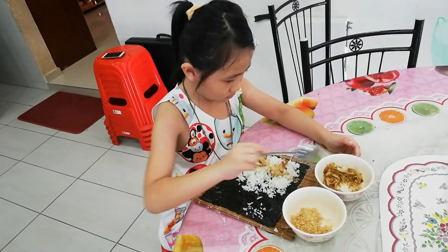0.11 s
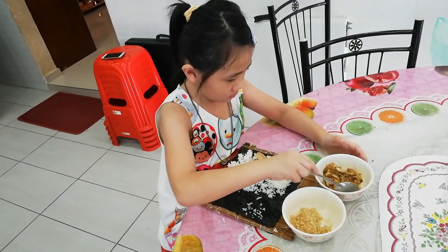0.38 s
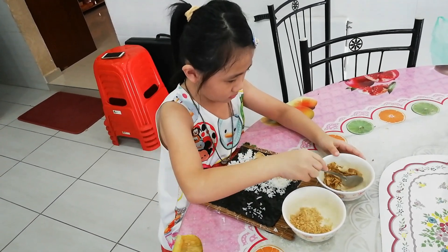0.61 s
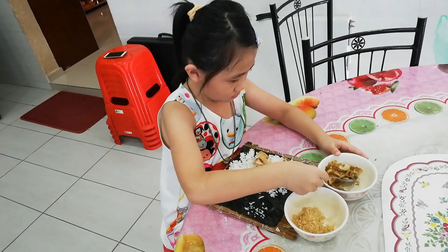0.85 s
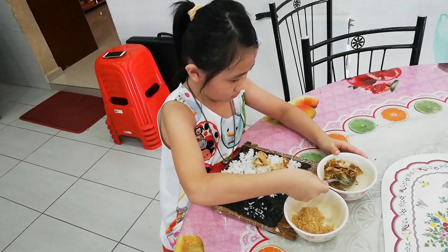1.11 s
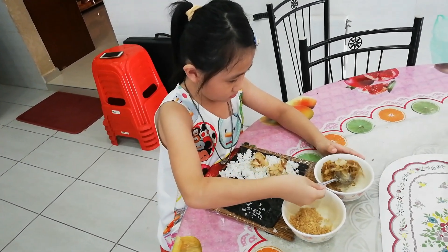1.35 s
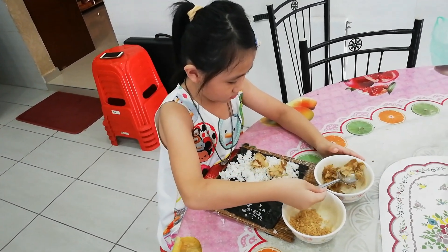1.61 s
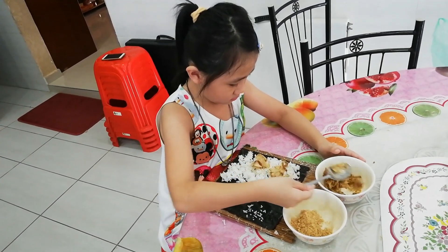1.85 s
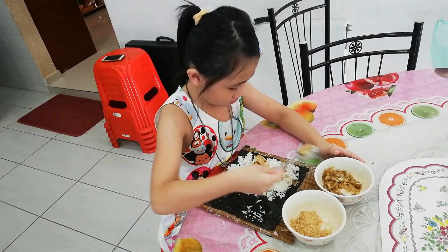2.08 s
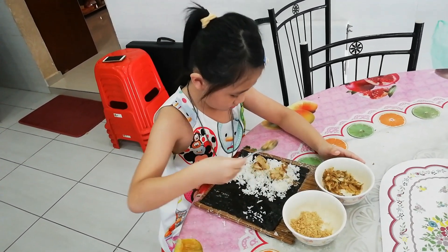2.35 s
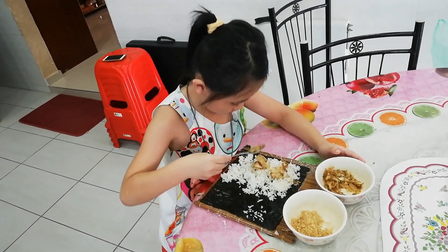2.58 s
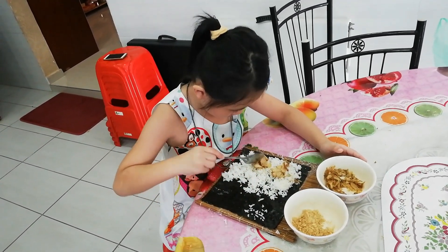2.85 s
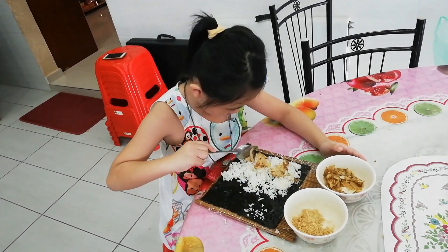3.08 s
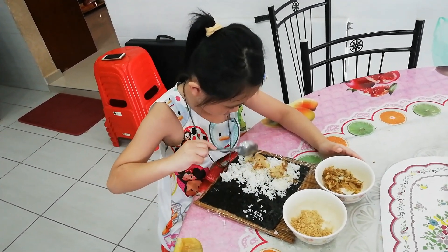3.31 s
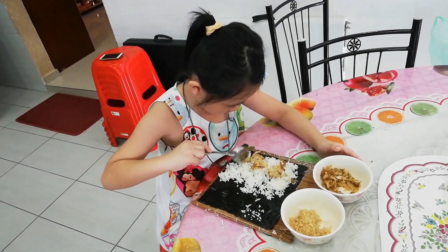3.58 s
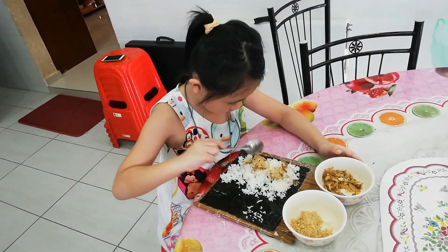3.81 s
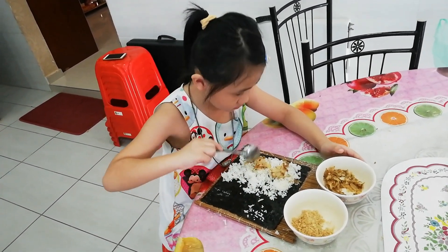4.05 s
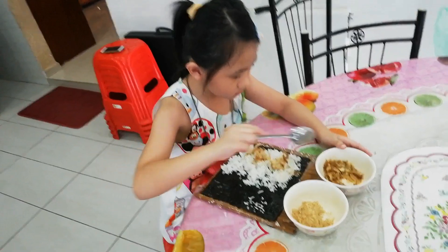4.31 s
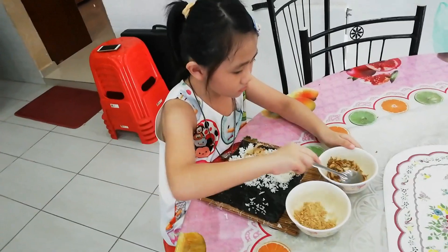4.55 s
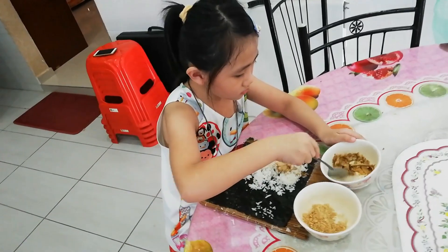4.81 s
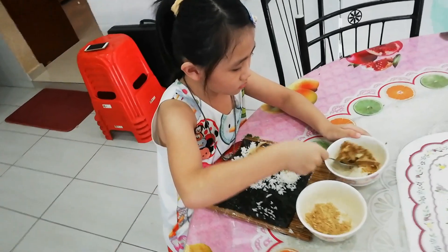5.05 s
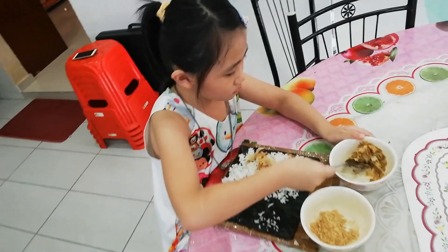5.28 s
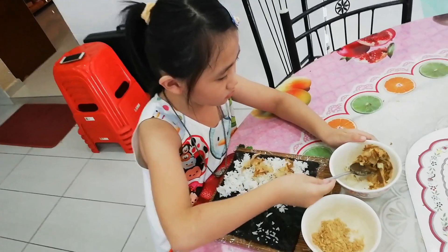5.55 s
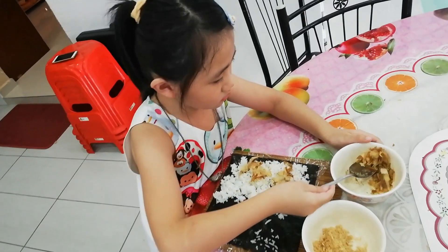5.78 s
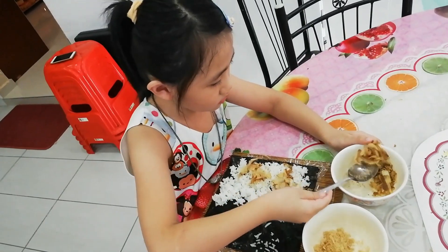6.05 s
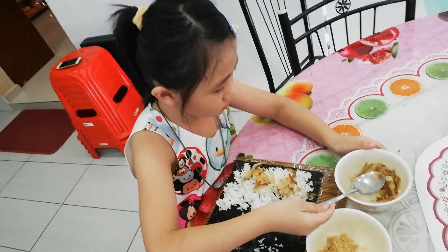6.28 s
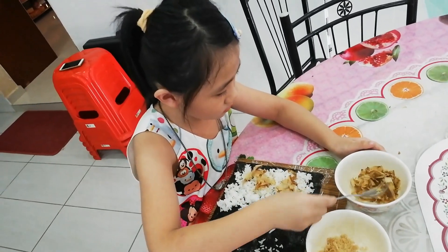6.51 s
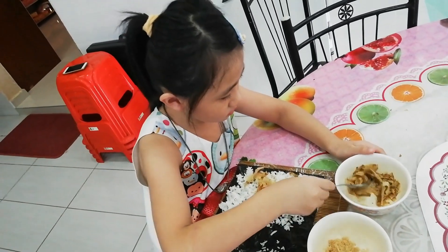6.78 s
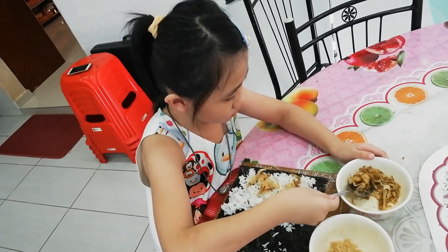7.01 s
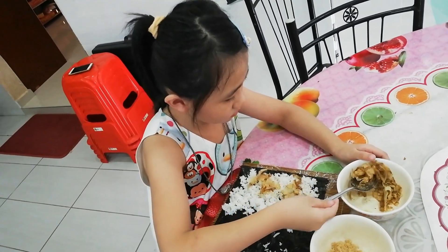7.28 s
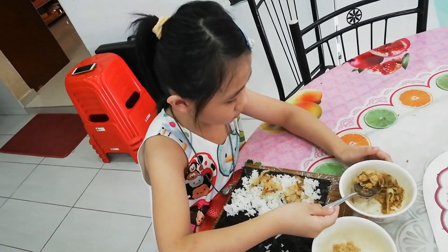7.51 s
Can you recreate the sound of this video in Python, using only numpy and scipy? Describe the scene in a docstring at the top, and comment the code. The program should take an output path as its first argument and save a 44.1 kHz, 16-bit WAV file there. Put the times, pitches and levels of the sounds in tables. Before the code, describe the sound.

A hard tiled indoor room holds steady fan hiss and low wavering motor hum, heard by two spaced microphones. At about 0.4 s a steel spoon clicks dully in a food-filled bowl close on the right, scraping softly until 0.7, with a fainter drag near 0.8. From 1.2 to 1.55 a distant drawer slides, gathering speed, and faint rubbed tones follow until 2.0. At 2.04 to 2.2 a far door clacks and bangs with a deep boom; a softer thud comes at 2.57, and a latch clack at 2.8 with a last knock at 3.0. Quieter room noise follows. A small hollow double tap sounds at 4.14. The spoon strikes hardest at 4.57, clinks again at 4.63 and 4.76 and scrapes brightly, with a short drag at 5.1. A final click and brief scrapes come at 6.67 to 6.8. Sparse dry ticks and faint treble rustles continue to about 7.5.

```python
"""Fans hiss and motors hum throughout in a hard tiled room; small dry ticks come now and then.
First a steel spoon clicks and scrapes in a damped, food-filled bowl to the right of two spaced microphones.
Then, farther off, a drawer slides, and a door latches and bangs with a deep boom.
Later a hollow object taps and the spoon scoops twice more. Contacts are short noise pushes that ring
damped modes; scrapes are grainy noise through such modes; the air is shaped noise and the hum is sines."""
import sys
import numpy as np
from scipy import signal
from scipy.fft import rfft, irfft, next_fast_len
from scipy.io import wavfile
from scipy.ndimage import uniform_filter1d, map_coordinates

SR = 44100
rng = np.random.default_rng(int(sys.argv[2]) if len(sys.argv) > 2 else 0)


def store_wav(level_fs):
    """Save 16-bit WAV to argv[1]."""
    pcm = np.round(np.clip(np.atleast_2d(level_fs), -1, 1) * 32767)
    wavfile.write(sys.argv[1], SR, pcm.T.astype(np.int16))


def to_linear_factor(level_db):
    """Convert decibel levels (scalar or array-like) to linear amplitude factors."""
    exponent = np.asarray(level_db, float) / 20
    return 10 ** exponent


N = 336700  # length of the scene in samples


def along(points, hz):
    """Reads a curve of (Hz, value) points on a log frequency axis."""
    f, v = np.transpose(points)
    return np.interp(np.log(hz + 1), np.log(f + 1), v)


def unit(x):
    """Scales a sound to rms 1."""
    return x / np.sqrt(np.mean(x ** 2) + 1e-20)


def wobble(rate):
    """A smooth random curve with rate knots a second."""
    knots = rng.standard_normal(int(N * rate / SR) + 4)
    return map_coordinates(knots, [np.arange(N) * rate / SR])


def filtered(x, response):
    """Multiplies the spectrum of x by a complex response of frequency."""
    m = 2 * next_fast_len(x.shape[-1] // 2 + 2048)
    spectrum = rfft(x, m) * response(np.fft.rfftfreq(m, 1 / SR))
    return irfft(spectrum, m)[..., :x.shape[-1]]


def body(modes, tilt_db=0, dips=(), steep=1.31):
    """Causal response of damped modes whose energies add, tilted by tilt_db per octave about 3 kHz."""
    def response(f):
        def peak(c, w):
            return (f * w) ** 2 / ((c * c - f * f) ** 2 + (f * w) ** 2)
        power = sum(to_linear_factor(db + tilt_db * np.log2(c / 3000)) ** 2 * peak(c, w) ** steep for c, w, db in modes)
        power = power * to_linear_factor(2 * sum(db * peak(c, w) for c, w, db in dips))
        # fold the cepstrum forward in time: the minimum-phase response starts at once
        cep = irfft(np.log(power + 1e-12) / 2)
        half = len(cep) // 2
        return np.exp(rfft(np.r_[cep[0], 2 * cep[1:half], np.zeros(len(cep) - half)]))
    return response


# How alike diffuse sound is at the two microphones.
# Each row: frequency in Hz, likeness from -1 (opposite) to 1 (the same).
LIKENESS = [(60, 1), (110, 1), (200, 0.94), (380, 0.5), (700, -0.7), (1290, 0.36), (2380, -0.07),
            (4400, -0.13), (8120, 0.24), (15000, -0.39)]


def turn_between(hz):
    """Angle in radians between left and right whose cosine is their likeness."""
    return np.arccos(np.clip(along(LIKENESS, hz), -1, 1))


def pair(length):
    """Spectrogram of diffuse noise at two spaced microphones: much alike in the bass only."""
    hz, t, (a, b) = signal.stft(rng.standard_normal((2, length)), SR, nperseg=256)
    turn = turn_between(hz)[:, None] / 2
    left = np.cos(turn) * a + np.sin(turn) * b
    right = np.cos(turn) * a - np.sin(turn) * b
    return hz, t, np.array([left, right])


LAG = 27  # samples by which the left microphone hears the right side late
# Left microphone's loss for sound from the right. Each row: frequency in Hz, gain in dB.
LEFT_SHADE = [(500, -6.5), (1000, -3), (2300, -21), (4500, -2.5), (8000, -2), (12000, -23.5)]
# How long the room rings. Each row: frequency in Hz, time to fall by 60 dB in seconds.
ROOM_DECAY = [(100, 0.86), (300, 0.63), (700, 0.89), (1840, 0.67), (4850, 0.74), (12800, 0.53),
              (15800, 0.15)]


def heard(x, pan_db, room_db, onset=0.00073, lean=0.25, dull_db=-2.5):
    """Direct sound from the right, late and shaded on the left, plus a fresh room tail that leans the same way.
    pan_db is left over right before the shading; onset is in seconds."""
    late = np.pad(x, (LAG, 0))[:len(x)]
    left = filtered(late, lambda hz: to_linear_factor(along(LEFT_SHADE, hz)))
    direct = np.array([left * to_linear_factor(pan_db / 2), x * to_linear_factor(-pan_db / 2)])
    hz, t, z = pair(SR)
    side = to_linear_factor(lean * (pan_db + along(LEFT_SHADE, hz)) / 2)[:, None]
    z = z * to_linear_factor(-60 * t / along(ROOM_DECAY, hz)[:, None]) * [side, 1 / side]
    tail = signal.istft(z, SR, nperseg=256)[1][:, :SR]
    # reflections thicken after the first walls
    tail = tail * (1 - np.exp(-(np.arange(SR) / SR / onset) ** 2))
    tail = tail * np.sqrt(2) / np.linalg.norm(tail)
    wet = signal.fftconvolve(x[None], tail, axes=1)[:, :len(x)]
    # the walls swallow the highest treble
    wet = filtered(wet, lambda hz: to_linear_factor(dull_db * np.log2(1 + (hz / 8000) ** 2)))
    return direct + to_linear_factor(room_db) * wet


def add(out, s, x):
    """Mixes x in at s seconds."""
    out[:, round(s * SR):][:, :x.shape[1]] += x


def blows(out, rows, modes, dips=()):
    """Each contact is a rough push of a few ms or so, about even in all frequencies, that rings the modes."""
    t = np.arange(SR) / SR
    for s, db, pan_db, tilt_db, room_db, ms in rows:
        u = t * 1000 / max(ms, .05)
        push = rfft(rng.standard_normal(SR) * u * np.exp(-2 * u))
        evenness = np.sqrt(np.abs(uniform_filter1d(np.abs(push) ** 2, size=250)) + 1e-9)
        push = irfft(push / evenness, SR) * (t < .4)
        ring = filtered(push, body(modes, tilt_db, dips))
        # the level counts the energy of the whole ring per ms
        ring = to_linear_factor(db) * ring * np.sqrt(SR / 1000) / np.linalg.norm(ring)
        add(out, s, heard(ring, pan_db, room_db))


def rubbing(out, rows, modes, dips=(), *, pan_db, room_db, grainy_db):
    """Friction noise in tiny grains; duller and brighter versions of the body cross-fade with the stroke."""
    s, db, tilt_db = np.transpose(rows)
    t = s[0] + np.arange(round((s[-1] - s[0] + 1) * SR)) / SR
    grains = unit(uniform_filter1d(rng.standard_normal(len(t)), size=60))
    grit = rng.standard_normal(len(t)) * to_linear_factor(grainy_db * grains)
    # -6 dB per octave or less is all dull, 6 or more all bright
    share = np.clip(.5 + np.interp(t, s, tilt_db) / 12, 0, 1)
    dull, bright = (unit(filtered(grit, body(modes, lean, dips))) for lean in (-6, 6))
    level = to_linear_factor(np.interp(t, s, db, right=-150))
    add(out, s[0], heard(level * unit((1 - share) * dull + share * bright), pan_db, room_db))


# Colour of the fans. Each row: frequency in Hz, relative level in dB per Hz.
FAN_COLOUR = [(12, -41), (20, -6), (70, -10), (100, -2.5), (132, -9), (170, -1.5), (231, -9.5), (304, -6.5),
              (475, -20), (828, -19.5), (1010, -22.5), (1700, -27), (6120, -31.5), (10700, -30),
              (15300, -39)]
# Level of the middle of the room noise, which jumps up around the door bangs.
# Each row: time in seconds, rise in dB.
MIDDLE_SWELL = [(0, 7), (1.1, 10), (1.9, 7.5), (2.0, 15.5), (2.7, 12.5), (3.3, 4.5), (4.25, 9), (4.5, 3.5),
                (5.3, 5.5), (7.6, 4.5)]
# Faint rustles in the treble. Each row: middle in seconds, rise over the hiss in dB, half length in seconds.
TREBLE_RUSTLES = [(3.97, 2.5, .04), (4.43, 4.5, 0.085), (5.4, 3.5, 0.46), (6.31, 3.5, 0.2),
                  (7.1, 5.5, 0.18)]
FAN_DB = -58.5  # rms before the swell and the rustles


def fans():
    """Shaped noise hisses and rumbles; its middle jumps up around the door bangs, its treble rustles at times."""
    hz, t, z = pair(N)
    middle = np.interp(t, *np.transpose(MIDDLE_SWELL))
    top = sum(db * np.exp(-((t - s) / half) ** 2) for s, db, half in TREBLE_RUSTLES)
    middle_share = along([(350, 0.1), (700, 0.49), (3500, 1), (5000, 0.35)], hz)
    top_share = along([(3500, 0), (5000, 1)], hz)
    swell_db = np.outer(middle_share, middle) + np.outer(top_share, top)

    def shape(z):
        noise = signal.istft(z, SR, nperseg=256)[1][:, :N]
        return filtered(noise, lambda f: to_linear_factor(along(FAN_COLOUR, f)))
    return to_linear_factor(FAN_DB) * shape(z * to_linear_factor(swell_db)) / np.std(shape(z))


# Steady tones of motors, the refrigerator among them. Each row: frequency in Hz, typical peak level in dB.
MOTOR_TONES = [(48.4, -66), (102.3, -63.5), (166.9, -72), (269.2, -68), (839.8, -73), (1475, -88),
               (1723, -78), (3628, -79.5), (8759, -77), (10013, -80), (10492, -82)]
WAVER_DB = 1.8  # how far the hum wavers


def motors():
    """Sines that waver in level and phase, turned between the microphones."""
    time = np.arange(N) / SR
    hum = 0
    for hz, db in MOTOR_TONES:
        level = to_linear_factor(db + WAVER_DB * wobble(4.7))
        turn = np.array([[0], [1]]) * turn_between(hz)
        hum = hum + level * np.sin(2 * np.pi * hz * time + 0.55 * wobble(6.8) + turn)
    return hum


# Small dry ticks. Each row: time in seconds, level in dB (energy per ms), left over right in dB before
# the shading, room in dB.
TICK_TIMES = [(0.1506, -51, -6, -4), (1.1834, -51.5, 2, 3), (2.7428, -41.5, 4, 8), (4.3616, -45.5, -18, 0),
              (4.368, -45, -2, -10), (4.3854, -49.5, -1.5, 7.5), (5.3304, -40.5, -2, 3.3),
              (5.6131, -44.5, -9, -1), (5.8358, -52, -2, -1), (7.4592, -53.5, -8, 7)]
TICK_TILT_DB, TICK_MS = 1.7, 0.35  # brightness in dB per octave, contact time


def ticks(out):
    """Very short pushes ring three broad modes."""
    rows = [(s, db, pan_db, TICK_TILT_DB, room_db, TICK_MS) for s, db, pan_db, room_db in TICK_TIMES]
    blows(out, rows, [(1150, 1800, 7.0), (4000, 10000, 0), (10600, 1700, 4.0)])  # (Hz, width Hz, dB)


# Bowl and spoon modes; their balance differs by chance from contact to contact. Each row: frequency in Hz,
# width in Hz, mean level in dB, swing in dB, offset in radians. Levels are before the brightness tilt.
BOWL_MODES = [(391.5, 9.4, -18.5, 0, 2.5), (620, 270, -35.5, 18.5, -2.1), (1130, 320, -7, 10, 0.01),
              (1377, 85, -12.5, 9, 2.5), (2045, 410, -10.5, 5.5, -2), (2590, 480, -6.5, -5, -4),
              (3390, 460, -0.5, 7, 0.93), (4295, 530, -1.5, 5.5, 0.62), (5020, 310, -2, 7, 0.9),
              (5840, 840, -10.5, 9.5, -2.5), (7190, 560, -0.5, 5.5, -1.15), (7777, 430, -4.5, 6.5, -1.03),
              (8180, 180, 0.2, 8, 3.5), (8820, 820, -5, 4, -3), (10470, 370, -1.5, 1.5, 0.99),
              (11330, 470, 1, 8.5, -1.96), (12870, 810, -8.5, 4.5, -2.2), (14500, 450, -17.9, 15, -1.3)]
# How many times each mode's level swings as the angle makes a full turn: one count per mode.
SWING_COUNTS = [2, 3, 2, 3, 4, 3, 3, 3, 3, 2, 2, 4, 4, 2, 4, 4, 3, 2]
# Narrow bands that are thin in the spoon sounds. Each row: frequency in Hz, width in Hz, gain in dB.
THIN_BANDS = [(3700, 160, -11.5), (6000, 190, -10)]


def bowl_modes(angle):
    """Each contact rings the modes in a chance balance, set by one angle and a count per mode."""
    modes = []
    for (hz, width, db, swing, offset), count in zip(BOWL_MODES, SWING_COUNTS):
        modes.append((hz, width, db + swing * np.cos(count * angle - offset)))
    return modes, THIN_BANDS


# Spoon contacts. Each row: time in seconds, blow in dB (energy per ms), brightness in dB per octave,
# room in dB, angle that sets the balance of the modes in radians.
SPOON_BLOWS = [(0.394, -25.5, -4.5, 5.5, 5.24), (0.41, -19, -2, 1, 5.47),
               (4.5678, -11.5, -0.86, -1.5, 1.11), (4.6282, -22, -0.5, 7.5, 1.08),
               (4.7569, -17, 18, -6, 4.74), (6.6676, -17.5, -0.4, 0.5, 1.44)]
SPOON_PAN_DB, SPOON_MS = -3.5, 2.14  # left over right before the shading, contact time


def spoon_clicks(out):
    """The spoon strikes the bowl in three scoops and rings its modes."""
    for s, db, tilt_db, room_db, angle in SPOON_BLOWS:
        blows(out, [(s, db, SPOON_PAN_DB, tilt_db, room_db, SPOON_MS)], *bowl_modes(angle))


# The spoon drags along the glaze. Each row: start in seconds, length in seconds, level in dB, swell over
# the stroke in dB, brightness in dB per octave, angle that sets the balance of the modes in radians.
SPOON_DRAGS = [(0.439, 0.23, -53.5, 5.5, -3, 5.3), (0.761, 0.073, -64, 5, -6, 5.7),
               (4.769, .15, -36.5, 1.5, 2, 4.79), (5.105, 0.11, -47, -14, 4, 0.073),
               (6.684, 0.056, -45, -2.5, -22, 1.62), (6.775, 0.025, -33.5, -6, 1.5, 2)]
BITE_S, LET_GO_S, EDGE_DB = .02, 0.048, -29  # a stroke rises from and falls to this far under its level


def spoon_scrapes(out):
    """Friction in grains drives the bowl while the spoon bites, drags and lets go."""
    for s, length, db, swell_db, tilt_db, angle in SPOON_DRAGS:
        end, end_db = s + length, db + swell_db
        stroke = [(s - BITE_S, db + EDGE_DB), (s, db), (end, end_db), (end + LET_GO_S, end_db + EDGE_DB)]
        rows = [(t, level, tilt_db) for t, level in stroke]
        rubbing(out, rows, *bowl_modes(angle), pan_db=0.0, room_db=-3.5, grainy_db=0.5)


# Narrow tones that sing briefly while something rubs. Each row: start in seconds, end in seconds,
# level in dB 25 ms after the start, frequency in Hz, width in Hz.
RUBBED_TONES = [(0.796, .934, -70, 2180, 31), (0.791, .934, -68.5, 2600, 29),
                (1.756, 1.86, -70.5, 1302, 54), (1.857, 2.01, -65, 1130, 70), (5.1, 5.28, -64, 4490, 120),
                (6.682, 6.797, -55, 2570, 110)]


def whistles(out):
    """Friction noise through one narrow mode, loudest at the start."""
    for start, end, db, hz, width in RUBBED_TONES:
        rows = [(start, db + 5, 0), (start + 0.025, db, 0), (end, db - 9.0, 0)]
        rubbing(out, rows, [(hz, width, 0)], pan_db=-18.0, room_db=3.0, grainy_db=0.5)


# The far drawer gathers speed and stops. Each row: time in seconds, level in dB.
DRAWER_SLIDE = [(1.172, -53), (1.19, -58.5), (1.42, -43.5), (1.5, -49.5), (1.56, -70)]
# Modes of the drawer. Each row: frequency in Hz, width in Hz, level in dB before the tilt.
DRAWER_MODES = [(730, 150, -2), (1080, 140, -2), (1250, 100, 0), (2020, 320, -8), (2374, 190, -4),
                (3020, 160, -17), (3380, 160, -42)]
SLIDE_TILT_DB = 7  # past 6, so wholly the brighter version


def drawer(out):
    """Coarse friction rings the drawer's modes as it slides."""
    rows = [(s, db, SLIDE_TILT_DB) for s, db in DRAWER_SLIDE]
    rubbing(out, rows, DRAWER_MODES, pan_db=-2, room_db=0.5, grainy_db=3.0)


# Low modes of the house. Each row: frequency in Hz, width in Hz, relative level in dB,
# time to fall by 60 dB in seconds.
LEAF_MODES = [(40, 11, -14.5, 2.2), (70, 59, -1.5, 1.27), (114, 19, -3, 0.76), (153.4, 22, 4.5, 0.31),
              (267, 58, -9, 0.97), (403, 15, -18, 0.7)]
BOOM_DB, BOOM_GROWS = 10, 2.975  # the leaf's boom grows faster than the clack


def leaf_boom(blow_db):
    """The heavy leaf shakes the low modes of the house, which swell and then die away."""
    t = np.arange(SR) / SR
    shake = rng.standard_normal(SR)
    boom = 0
    for hz, width, db, t60 in LEAF_MODES:
        tone = unit(filtered(shake, body([(hz, width, 0)])))
        boom = boom + tone * to_linear_factor(db - 60 * t / t60)
    boom = to_linear_factor(BOOM_GROWS * blow_db + BOOM_DB) * boom * (1 - np.exp(-(t / 0.024) ** 2))
    return np.array([np.roll(boom, LAG // 2), boom])


# Far door. Each row: time in seconds, blow in dB (energy per ms), brightness in dB per octave,
# room in dB, contact time in ms.
DOOR_BLOWS = [(2.042, -22.5, 2, 3.5, 14), (2.16, -23, 0.5, 6, 12), (2.1755, -13, .8, -0.5, 3.7),
              (2.191, -16, -0.1, 8.5, 4.3), (2.565, -31.5, -0.2, 2, 47), (2.8045, -19.5, 1.2, 3, 3.6),
              (2.824, -33, 3.7, 14, 9.7), (2.996, -25, -2, 4.5, 3)]
# Modes of the latch. Each row: frequency in Hz, width in Hz, level in dB before the tilt.
LATCH_MODES = [(460, 110, -13), (950, 640, -5), (1320, 320, -7.5), (2030, 640, -3), (2770, 630, -0.5),
               (4630, 510, -19.5), (8000, 4800, -13.5), (11300, 2300, -20)]


def door(out):
    """The latch clacks and the leaf booms with each blow."""
    blows(out, [(s, db, 0, *rest) for s, db, *rest in DOOR_BLOWS], LATCH_MODES)
    for s, db, *_ in DOOR_BLOWS:
        add(out, s, leaf_boom(db))


# A small hollow object taps. Each row: time in seconds, level in dB (energy per ms), left over right
# in dB before the shading.
TAP_TIMES = [(4.137, -35.5, -9.5), (4.143, -33, -1)]
# Modes of the hollow object. Each row: frequency in Hz, width in Hz, relative level in dB.
HOLLOW_MODES = [(1560, 105, 16), (2600, 92, 15.5), (3380, 340, -10), (4100, 300, -22), (5200, 400, -17)]
TAP_ROOM_DB, TAP_MS = -5.5, 1.6


def taps(out):
    """Short pushes ring the modes of a hollow object."""
    blows(out, [(s, db, pan_db, 0, TAP_ROOM_DB, TAP_MS) for s, db, pan_db in TAP_TIMES], HOLLOW_MODES)


def scene():
    """Table, far drawer and door, and room noise."""
    out = np.zeros((2, N + 3 * SR))  # room for tails past the end
    ticks(out)
    spoon_clicks(out)
    spoon_scrapes(out)
    whistles(out)
    drawer(out)
    door(out)
    taps(out)
    return out[:, :N] + fans() + motors()


def top_cut(x):
    """Nothing passes above the cut-off."""
    return signal.sosfilt(signal.butter(12, 16480, fs=SR, output="sos"), x)


TOP_HZ = 15400  # the highest treble is cut above this


def record(dry):
    """The sound falls 14 dB per 500 Hz above its top edge, 42 dB at most."""
    mix = filtered(dry, lambda hz: to_linear_factor(-14 * np.clip((hz - TOP_HZ) / 500, 0, 3)))
    return top_cut(mix)


dry = scene()
out = record(dry)
store_wav(out)
```